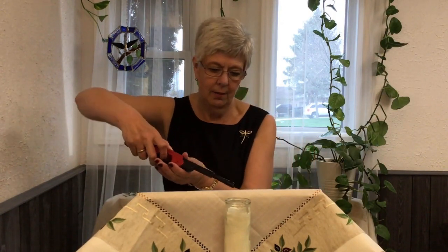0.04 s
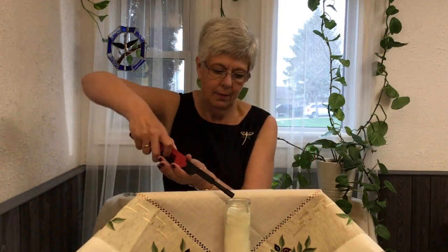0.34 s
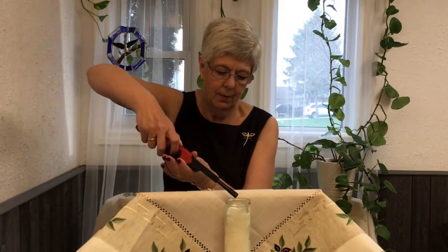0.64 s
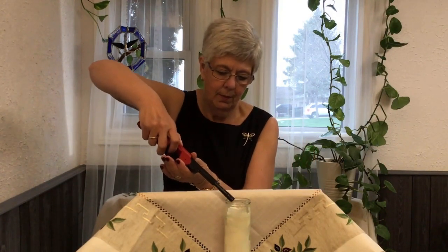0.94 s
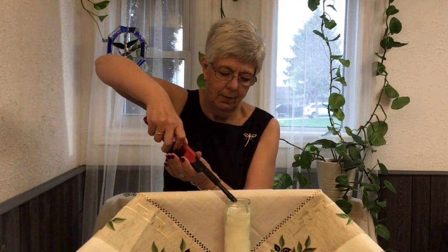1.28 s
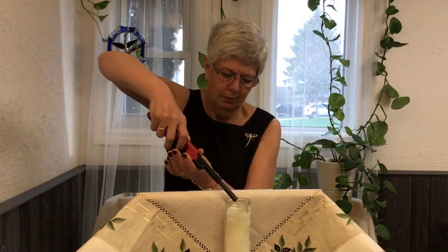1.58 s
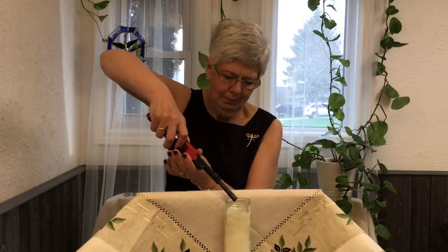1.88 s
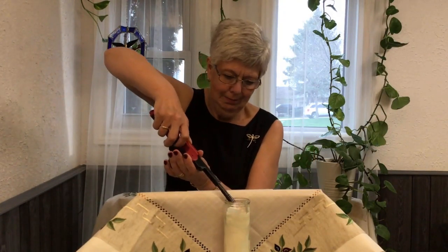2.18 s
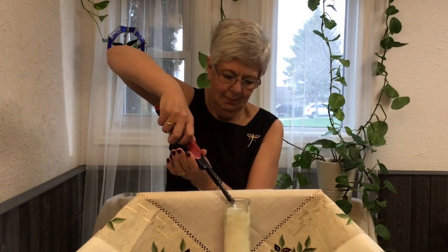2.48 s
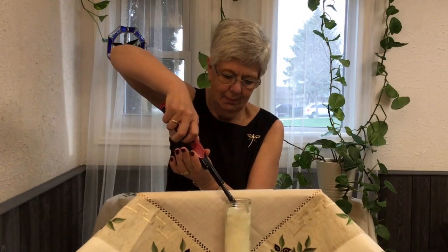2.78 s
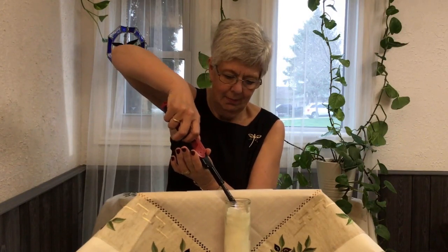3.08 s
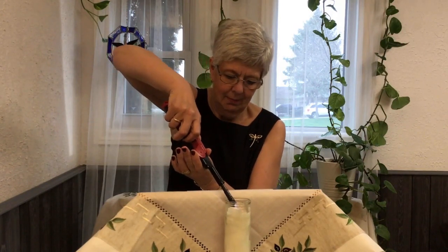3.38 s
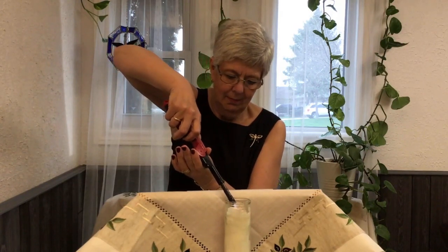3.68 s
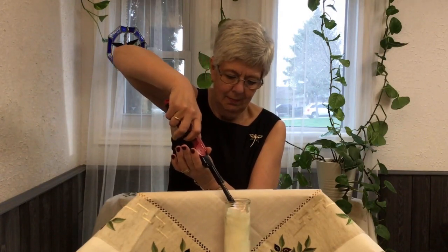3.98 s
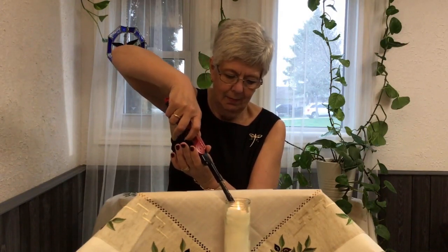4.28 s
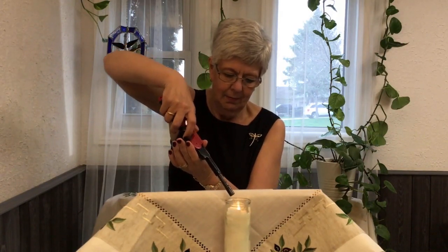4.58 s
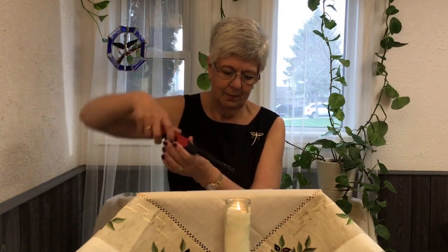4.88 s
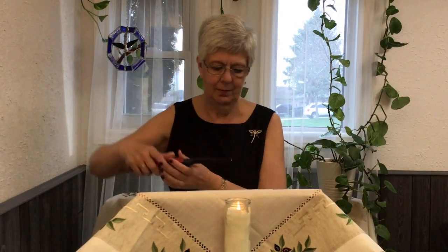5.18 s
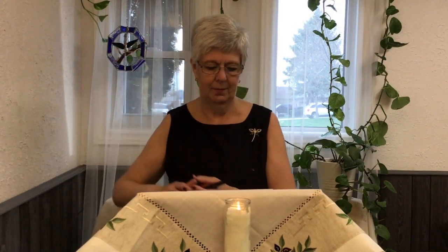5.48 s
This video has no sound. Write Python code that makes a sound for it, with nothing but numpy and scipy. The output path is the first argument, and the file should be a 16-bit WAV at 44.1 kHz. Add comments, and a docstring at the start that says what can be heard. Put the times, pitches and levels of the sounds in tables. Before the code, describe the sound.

Faint rumble and hiss of a small, quiet room lie under everything. At 0.1 seconds a utility lighter starts leaking a thin gas hiss, and its igniter snaps sharply at 0.3 without catching. The hiss stops around 0.6. A second snap at 1.0 brings another short hiss. Light plastic knocks and spring ticks fall between the tries, with a faint finger rub near 1.7. At 2.0 the third snap lights the gas with a soft, low pop. A small flame burns with a quiet, fluttering rush and a faint, very high, fuzzy whistle that rises slightly. The trigger spring pings thinly at 2.2 and 2.4, and occasionally afterwards as the rush weakens. The flame stops at 4.0. Small case clicks follow, the neck lightly bumps the candle at 4.4, and the last tiny ticks end by 4.7, leaving room tone until about 5.5. The three snaps are loudest.

```python
"""A long-necked butane lighter over a candle in a small, quiet room.
The piezo hammer snaps at 0.3 s and 1.0 s, and the gas only hisses. The trigger spring ticks
under the finger; the plastic case knocks and rubs as the grip shifts. At 2.0 s the third spark
catches with a soft pop, and a small jet flame burns, its whistle rising as the nozzle warms.
At 4.0 s the valve shuts; the neck bumps the candle as it is drawn away."""
import sys
import numpy as np
from scipy import signal
from scipy.fft import rfft, irfft
from scipy.io import wavfile
from scipy.ndimage import uniform_filter1d

SR = 44100
rng = np.random.default_rng(int(sys.argv[2]) if len(sys.argv) > 2 else 0)


def output_pcm(signal):
    """Save a mono or channel-first signal as 16-bit PCM at the path in sys.argv[1].

    Samples are clipped to [-1, 1] before scaling.
    """
    pcm = np.clip(np.atleast_2d(signal).T, -1, 1) * 32767
    wavfile.write(sys.argv[1], SR, np.round(pcm).astype(np.int16))


N = 248843


def gain_of(db):
    """Decibels to amplitude."""
    return 10 ** (np.asarray(db) / 20)


def unit_rms(x):
    """Scales to rms 1."""
    return x / np.sqrt(np.mean(x ** 2) + 1e-20)


def curve_at(points, hz):
    """Interpolates on a log-frequency axis."""
    point_hz, value = np.transpose(points)
    return np.interp(np.log(hz + 1), np.log(point_hz + 1), value)


def add(mix, start_s, sound):
    """Mixes a sound in at start_s."""
    part = mix[round(start_s * SR):][:len(sound)]
    part += sound[:len(part)]


def held(start_s, stop_s, attack_s, release_s):
    """Envelope: exponential rise, hold, exponential release."""
    t = np.arange(N) / SR
    rise = 1 - np.exp(-np.maximum(t - start_s, 0) / attack_s)
    return rise * np.exp(-np.maximum(t - stop_s, 0) / release_s)


def flutter(rate_hz, depth_db, count=1024):
    """Random gain, wandering up to about rate_hz."""
    hz = np.fft.rfftfreq(count, N / SR / count)
    slow = unit_rms(irfft(rfft(rng.standard_normal(count)) / (1 + (hz / rate_hz) ** 4)))
    return np.interp(np.arange(N), np.linspace(0, N, count), gain_of(depth_db * slow))


def body(spectrum, modes, size=4096):
    """Minimum-phase impulse response of a broad spectrum plus resonances."""
    hz = abs(np.fft.fftfreq(size, 1 / SR))
    power = gain_of(curve_at(spectrum, hz)) ** 2
    for centre_hz, width_hz, db in modes:
        power += gain_of(db) ** 2 / (1 + ((hz - centre_hz) / width_hz) ** 2) ** 2
    log_response = np.conj(signal.hilbert(np.log(power) / 2))
    return np.fft.ifft(np.exp(log_response)).real[:size // 2]


def noise(spectrum, modes=()):
    """Coloured noise, rms 1."""
    response = body(spectrum, modes, size=16384)
    white = rng.standard_normal(N + len(response) - 1)
    return unit_rms(signal.oaconvolve(white, response, "valid"))


# room tone: (frequency [Hz], level [dB])
AIR_SPECTRUM = [(12, -49), (20, -5.5), (64, -3), (140, -9.5), (175, -8), (245, -8), (324, -14),
                (725, -16.5), (1380, -19.5), (4430, -24.5), (15500, -23.5)]

def still_room(air_db=-67.5, whine_hz=10374, whine_db=-91):
    """Soft rumble and hiss, with a faint electrical whine."""
    whine = np.sin(2 * np.pi * whine_hz * np.arange(N) / SR)
    return gain_of(air_db) * noise(AIR_SPECTRUM) + gain_of(whine_db) * whine


# room decay: (frequency [Hz], t60 [s])
ROOM_DECAY = [(200, 0.73), (1500, 0.17), (4000, 0.21), (9000, 0.14), (15000, 0.052)]

def reflections(near_db=-6.5, near_t60_s=0.11, echoes_per_s=4000, tail_db=-12, gap_s=.0025):
    """Quick echoes off table and arms, and a short tail whose treble dies first; new on each call."""
    t = np.arange(SR // 4) / SR
    hz, frame_s, frames = signal.stft(rng.standard_normal(len(t)), SR, nperseg=256)
    fade = gain_of(-60 * frame_s / curve_at(ROOM_DECAY, hz)[:, None])
    tail = signal.istft(frames * fade, SR, nperseg=256)[1][:len(t)]
    spikes = rng.choice([-1, 1], len(t)) * (rng.random(len(t)) < echoes_per_s / SR)
    near = spikes * gain_of(-60 * t / near_t60_s)
    echo = gain_of(near_db) * near / np.linalg.norm(near)
    echo += gain_of(tail_db) * tail / np.linalg.norm(tail)
    return np.pad(echo, (round(gap_s * SR), 0))


def in_room(sound):
    """A short sound plus its reflections."""
    wet = signal.fftconvolve(sound, reflections())
    add(wet, 0, sound)
    return wet


def contact(decay_s, size=2048, smooth_bins=56):
    """Dying chatter between two hard parts, spectrally flattened."""
    t = np.arange(size) / SR
    burst = rfft(rng.standard_normal(size) * np.exp(-t / max(decay_s, 1 / SR)), 2 * size)
    smooth_power = uniform_filter1d(abs(burst) ** 2, smooth_bins)
    return irfft(burst / np.sqrt(smooth_power))[:size]


# low, middle and high band of a click: (from [Hz], to [Hz])
CLICK_BANDS = [(60, 2500), (2500, 7500), (7500, 15900)]
BAND_FILTERS = [signal.butter(4, edges_hz, "band", fs=SR, output="sos") for edges_hz in CLICK_BANDS]

def click(response, decay_s, db, bright_db, middle_db):
    """A contact rings a body. Brightness is high band minus low; band levels are rms over 10 ms."""
    ring = signal.fftconvolve(contact(decay_s), response)
    bands = [signal.sosfilt(sos, ring) for sos in BAND_FILTERS]
    gains = gain_of([db - bright_db / 2, db + middle_db, db + bright_db / 2])
    shaped = sum(gain * band / np.linalg.norm(band) for gain, band in zip(gains, bands))
    return in_room(np.sqrt(SR / 100) * shaped)


def thuds(rows):
    """Soft blows, one damped mode each."""
    t, out = np.arange(SR // 3) / SR, np.zeros(N)
    for start_s, hz, db, t60_s in rows:
        mode = gain_of(db - 60 * t / t60_s) * np.sin(2 * np.pi * hz * t)
        add(out, start_s, in_room(mode))
    return out


# finger friction: (frequency [Hz], level [dB])
RUB_SPECTRUM = [(500, -4), (2000, 0.5), (5000, -4), (8000, 2), (15000, -6)]

def finger_rub(db=-67.5):
    """Fingers slide unevenly on the case."""
    slide = gain_of(db) * held(start_s=1.643, stop_s=1.768, attack_s=.035, release_s=.022)
    return slide * flutter(rate_hz=52, depth_db=4) * noise(RUB_SPECTRUM)


# plastic case: (frequency [Hz], level [dB])
CASE_SPECTRUM = [(200, -10.5), (700, -6.5), (950, -5.5), (1300, 0), (2100, -1.5), (2600, -8.5),
                 (3200, -5.5), (5000, -11), (7000, -8), (10000, 1), (15500, 2.5)]
# case and trigger knocks: (time [s], level [dB], brightness [dB], case ring [Hz])
CASE_KNOCKS = [(.439, -67.5, -14, 1160), (0.6547, -57.5, 7, 1210), (.888, -56, -1.5, 2250),
               (1.385, -55.5, 7, 1520), (1.3983, -58, -2, 1280), (1.461, -67, -12.5, 1550),
               (1.6447, -66.5, 12, 1190), (1.6751, -68.5, 12, 2160), (1.709, -68.5, 14, 2100),
               (1.737, -69, 15, 2130), (1.821, -56.5, 0.5, 1490), (3.255, -65, 12, 1500),
               (4.075, -64.5, 5, 2240), (4.1055, -58.5, 5.5, 2170), (4.145, -60, -1.5, 1720),
               (4.395, -68, -5, 1280), (4.438, -62, -3, 1130), (4.5162, -73.5, 18, 2160),
               (4.579, -69.5, 15, 2270), (4.72, -71.5, 15, 2300)]

def case_knocks(dull_decay_s=0.0049, shortening=0.36, ring_width_hz=200, ring_db=3):
    """The case knocks in the hand; a brighter knock is a harder, shorter contact."""
    out = np.zeros(N)
    for start_s, db, bright_db, ring_hz in CASE_KNOCKS:
        case = body(CASE_SPECTRUM, [(ring_hz, ring_width_hz, ring_db)])
        decay_s = dull_decay_s * gain_of(-shortening * max(bright_db, 0))
        add(out, start_s, click(case, decay_s, db, bright_db, middle_db=-5.5))
    return out


# neck on candle: (time [s], frequency [Hz], level [dB], t60 [s])
CANDLE_BUMP = [(4.4328, 1115, -45, 0.018)]

def candle_bump():
    """The neck bumps the candle as it is drawn away."""
    return thuds(CANDLE_BUMP)


# trigger spring: (frequency [Hz], level [dB])
SPRING_SPECTRUM = [(200, -30.5), (650, -5.5), (1800, -13.5), (2600, -12), (3300, -14.5), (5200, -14),
                   (9500, -13), (15500, -14.5)]
# its modes: (frequency [Hz], width [Hz], level [dB])
SPRING_RESONANCES = [(3440, 104, 0), (3700, 84, 0), (4020, 190, -7), (6570, 68, -1.5), (8150, 100, -18),
                     (9870, 720, -8), (12900, 100, -18), (14700, 500, -10)]
# its slips: (time [s], level before trim [dB])
SPRING_SLIPS = [(.996, -56), (1.121, -59.5), (1.227, -66.5), (1.9725, -48.5), (2.1875, -55),
                (2.3727, -48.5), (2.563, -63), (3.212, -59), (3.861, -61), (3.898, -61.5), (3.9975, -57),
                (4.132, -58), (4.213, -61)]

def trigger_spring(trim_db=-2.0, decay_s=0.0067, usual_db=-57.5, usual_bright_db=4.5, bright_slope=0.55):
    """The spring slips with a thin ping; harder slips are brighter."""
    out, spring = np.zeros(N), body(SPRING_SPECTRUM, SPRING_RESONANCES)
    for start_s, db in SPRING_SLIPS:
        bright_db = usual_bright_db + bright_slope * (db - usual_db)
        add(out, start_s, click(spring, decay_s, db + trim_db, bright_db, middle_db=-0.85))
    return out


# lighter shell: (frequency [Hz], level [dB])
SHELL_SPECTRUM = [(150, -29.5), (550, -18.5), (950, -12), (1300, -4), (2000, -4), (2500, -12.5), (3200, -3),
                  (4100, -2), (5100, -9), (6500, 1), (7500, -4), (10000, 11), (12400, 7), (15500, 5.5)]
# its modes: (frequency [Hz], width [Hz], level [dB])
SHELL_RESONANCES = [(3500, 220, -12), (9400, 100, 0.5), (8900, 120, -1), (9800, 150, -9), (11300, 300, 5),
                    (13320, 200, -1), (14900, 190, 19)]
# snaps: (time [s], level [dB], brightness [dB], middle offset [dB], bounce delay [s],
#         case ring [Hz], drag offset [dB])
HAMMER_SNAPS = [(.2646, -40, 12, -4, .001, 1360, -33), (1.0401, -41, 11, -1.5, .0014, 1530, -7.5),
                (2.0197, -38, 16.5, -5.5, .0022, 2080, -38)]

def piezo_hammer(drag_s=.0025, drag_decay_s=0.0014, blow_decay_s=0.00092, ring_width_hz=260, ring_db=2):
    """The hammer drags, strikes the shell, bounces once, then settles with a softer, duller blow."""
    out = np.zeros(N)
    for strike_s, db, bright_db, middle_db, bounce_s, ring_hz, drag_db in HAMMER_SNAPS:
        shell = body(SHELL_SPECTRUM, [*SHELL_RESONANCES, (ring_hz, ring_width_hz, ring_db)])
        dull_db = bright_db - 3.5
        settle_s = strike_s + 2.4 * bounce_s
        add(out, strike_s - drag_s, click(shell, drag_decay_s, db + drag_db, dull_db, middle_db))
        add(out, strike_s, click(shell, blow_decay_s, db, bright_db, middle_db))
        add(out, strike_s + bounce_s, click(shell, blow_decay_s, db + 0.5, bright_db, middle_db))
        add(out, settle_s, click(shell, blow_decay_s, db - 6, dull_db, middle_db=2))
    return out


# unlit gas: (frequency [Hz], level [dB])
GAS_SPECTRUM = [(800, -11.5), (3300, -13.5), (4600, -29), (6500, -16), (7600, -12), (8700, -9.5),
                (10000, -8.5), (11400, -3), (12500, -12), (14000, -10), (15500, -2.5)]
# its resonances: (frequency [Hz], width [Hz], level [dB])
GAS_RESONANCES = [(8750, 330, -3.5), (9370, 280, 2.5), (10450, 210, -0.5)]
# valve openings: (open [s], close [s], level [dB])
UNLIT_PUFFS = [(0.094, 0.63, -63.5), (1.03, 1.365, -63.5), (2.03, 2.098, -57)]

def unlit_gas(attack_s=.05, release_s=0.016):
    """Cold gas hisses while the trigger holds the valve open."""
    flow = sum(gain_of(db) * held(open_s, close_s, attack_s, release_s)
               for open_s, close_s, db in UNLIT_PUFFS)
    return flow * noise(GAS_SPECTRUM, GAS_RESONANCES)


LIT_S, OUT_S = HAMMER_SNAPS[-1][0], 4.03  # last spark catches; valve shuts
FLAME_AGE_S = np.maximum(np.arange(N) / SR - LIT_S, 0)

# hiss under the whistle: (frequency [Hz], level [dB])
JET_SPECTRUM = [(1500, -1), (3500, -0.5), (4600, -16), (6500, -0.5), (9500, -3), (12300, -5), (15000, -0.5)]

def jet_whistle(db=-68, hiss_db=-3, cold_hz=14700, warm_hz=15450, warming_s=.5, width_hz=650):
    """The lit jet narrows to a very high, fuzzy whistle that rises as the nozzle warms."""
    hz = warm_hz + (cold_hz - warm_hz) * np.exp(-FLAME_AGE_S / warming_s)
    carrier = np.exp(2j * np.pi * np.cumsum(hz) / SR)
    pole = np.exp(-2 * np.pi * width_hz / SR)
    white = rng.standard_normal(N) + 1j * rng.standard_normal(N)
    fuzz = signal.lfilter([1], [1, -2 * pole, pole * pole], white)
    jet = unit_rms((carrier * fuzz).real) + gain_of(hiss_db) * noise(JET_SPECTRUM)
    return gain_of(db) * held(LIT_S, OUT_S, attack_s=.08, release_s=0.019) * jet


# flame rush: (frequency [Hz], level [dB])
RUSH_SPECTRUM = [(50, -29.5), (120, -10), (230, -9.5), (500, -9), (600, -9), (900, -16), (1080, -17),
                 (1400, -17), (2300, -17), (2650, -20), (3000, -32.5), (4500, -49)]
# nozzle modes: (frequency [Hz], width [Hz], level [dB])
NOZZLE_RESONANCES = [(165, 12, -5), (235, 24, -3.5), (405, 33, 2), (479.6, 27, 1.5), (746, 17, -3.5),
                     (845, 41.4, 0.5), (1647, 40, -5), (1837, 60, -8.5), (2135, 18, -6.5), (2264, 63, -7.5)]
# gas catching: (time [s], frequency [Hz], level [dB], t60 [s])
IGNITION_POP = [(2.02, 45.5, -56, 0.27), (2.022, 137, -64, 0.073), (2.022, 233, -50, 0.055),
                (2.022, 362, -50, 0.06)]
# pushes opening the valve further: (time after ignition [s], added flow before sag [dB])
TRIGGER_PUSHES = [(0, -65.5), (.165, -58.5), (.35, -60), (1.97, -61)]

def flame(flare_db=-55.5, flare_decay_s=0.019, sag_db=12, sag_s=1.56):
    """The gas lights with a pop and a flare; turbulence sounds the nozzle, sagging as it burns."""
    flow = sum(gain_of(db) * held(LIT_S + after_s, OUT_S, attack_s=.015, release_s=.014)
               for after_s, db in TRIGGER_PUSHES)
    flare = gain_of(flare_db) * (FLAME_AGE_S > 0) * np.exp(-FLAME_AGE_S / flare_decay_s)
    sag = gain_of(-sag_db * (1 - np.exp(-FLAME_AGE_S / sag_s)))
    pop = thuds(IGNITION_POP)
    rush = flutter(rate_hz=14, depth_db=0.95) * noise(RUSH_SPECTRUM, NOZZLE_RESONANCES)
    return pop + (flare + flow * sag) * rush


def scene(side_db=-9, side_middle_db=5, side_above_hz=4100):
    """All sources centred; only treble reflections spread to the sides, most around 5 kHz."""
    mid = piezo_hammer() + trigger_spring() + case_knocks() + finger_rub() + candle_bump() + flame()
    mid += (jet_whistle() + unlit_gas()) * flutter(rate_hz=50, depth_db=1.56)
    mid += still_room()
    spread = gain_of(side_db) * signal.oaconvolve(mid, reflections())[:N]
    spread += gain_of(side_middle_db) * signal.sosfiltfilt(BAND_FILTERS[1], spread)
    highpass = signal.ellip(8, 1, 60, side_above_hz, "high", fs=SR, output="sos")
    side = signal.sosfilt(highpass, spread)
    return np.array([mid + side, mid - side])


def record(dry):
    """Low-pass at 15.9 kHz."""
    lowpass = signal.firwin(401, 15900, window=("kaiser", 7), fs=SR)
    return signal.oaconvolve(dry, lowpass[None], "same")


dry = scene()
out = record(dry)
output_pcm(out)
```